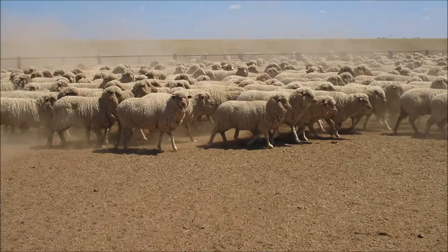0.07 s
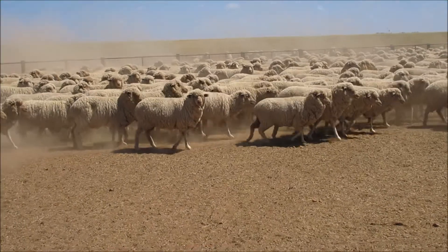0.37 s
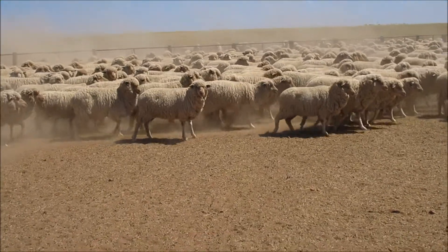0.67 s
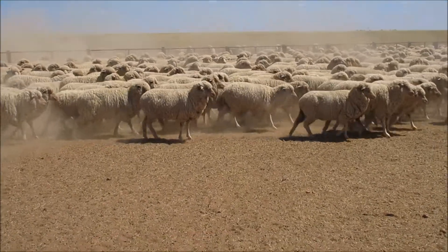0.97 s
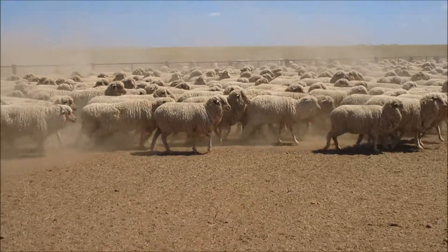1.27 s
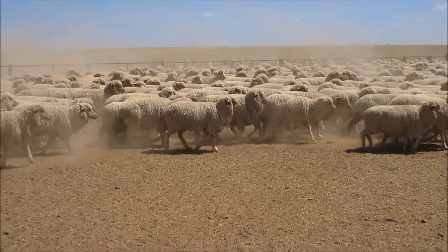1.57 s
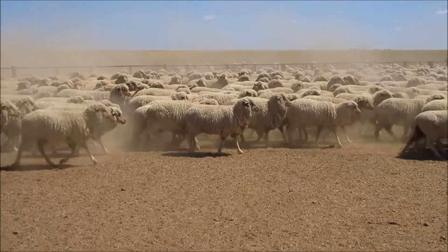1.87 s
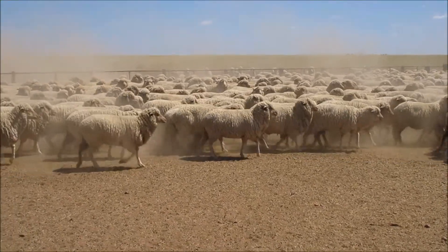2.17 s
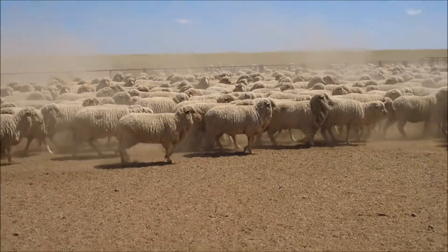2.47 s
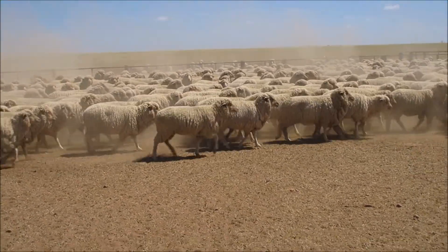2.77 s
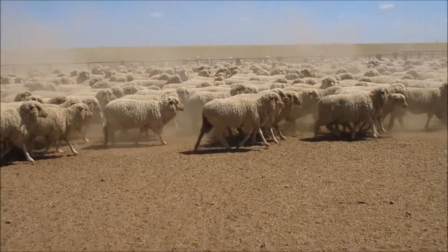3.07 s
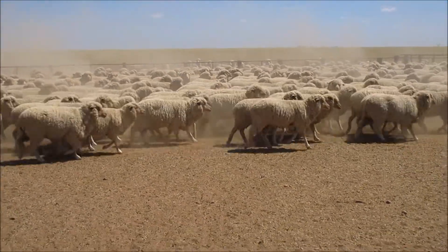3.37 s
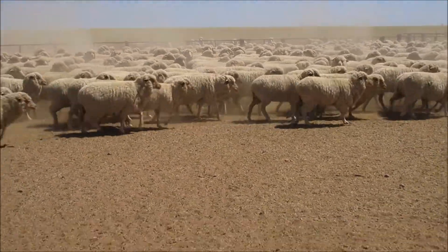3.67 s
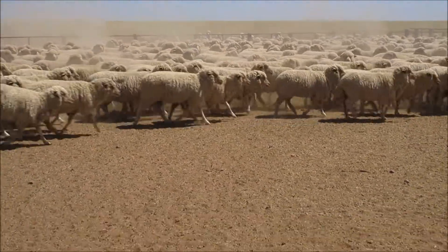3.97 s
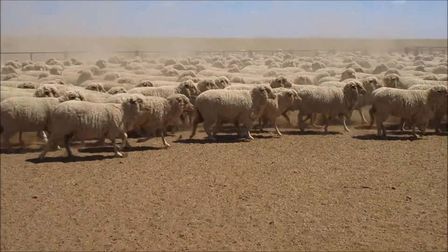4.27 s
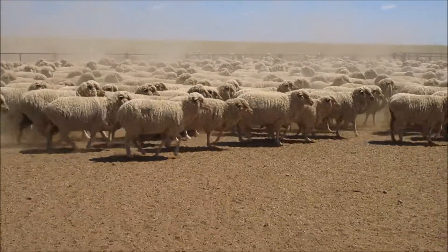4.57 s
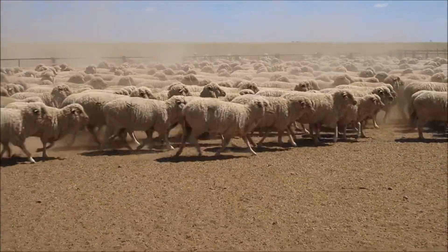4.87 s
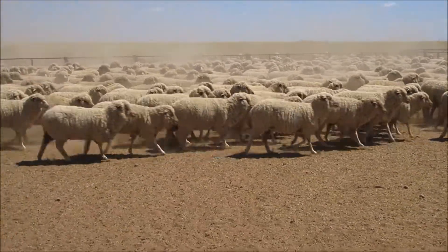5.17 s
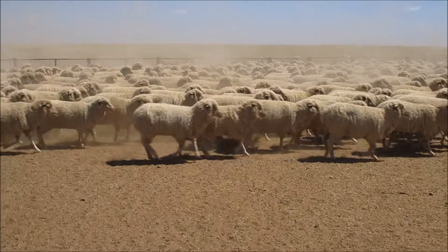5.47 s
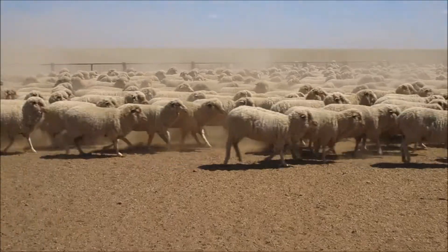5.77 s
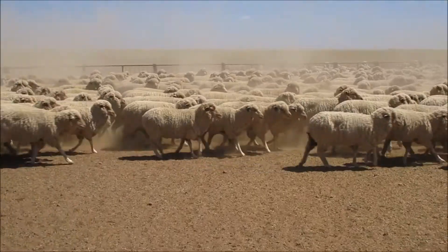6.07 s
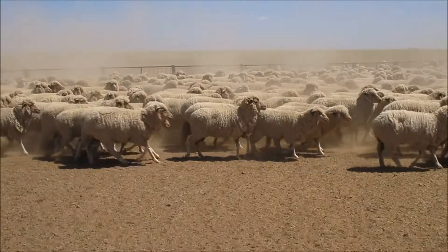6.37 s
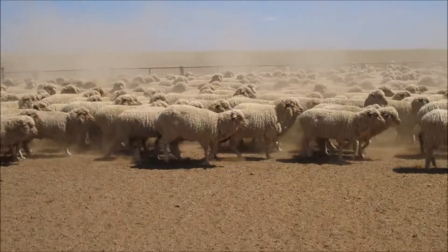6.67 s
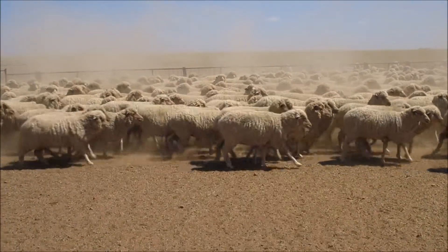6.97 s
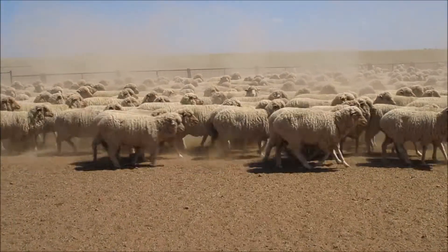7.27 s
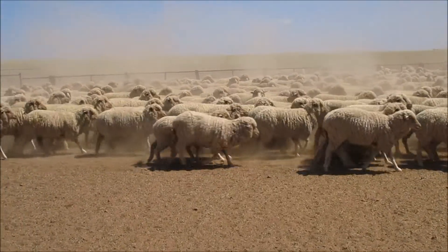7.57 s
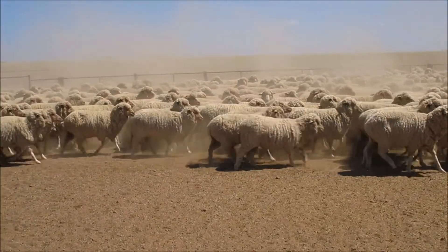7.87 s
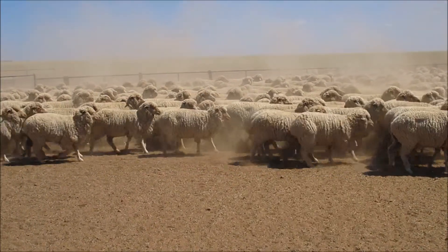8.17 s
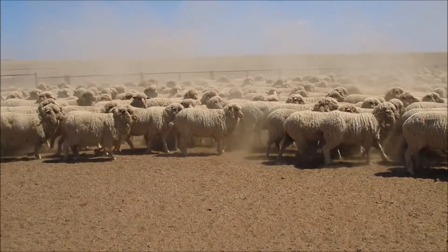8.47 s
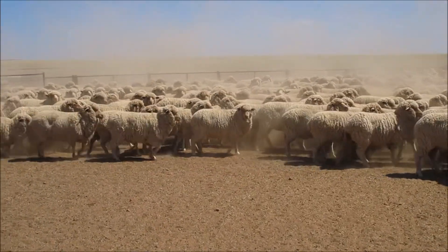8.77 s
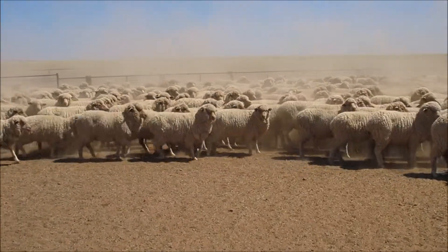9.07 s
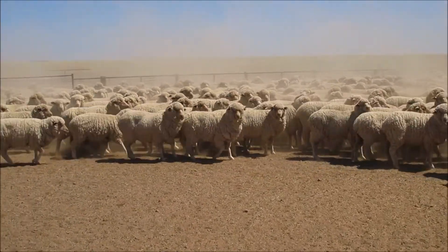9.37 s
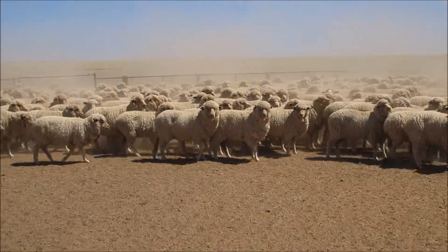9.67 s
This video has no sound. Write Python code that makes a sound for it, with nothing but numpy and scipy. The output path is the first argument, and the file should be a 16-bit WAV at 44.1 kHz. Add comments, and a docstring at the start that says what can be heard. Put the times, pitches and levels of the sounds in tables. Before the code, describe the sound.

Out in the open, many sheep hooves make a quiet, continuous patter on dry, gritty earth, dotted with small stone clicks and brief scrapes. Wind hits the microphone in low, fluttering gusts, faint to begin with, then stronger. In the later seconds hard thumps dominate, briefly pushing down all other sound, and one cracks sharply. The shuffling dies away under the continuing wind.

```python
"""A large flock of sheep shuffles past outdoors, over dry, gritty ground, in a light wind.
Countless hooves thud, scuff the dust and crunch grit; now and then one clicks on a pebble or drags.
From 3 s stronger gusts roll eddies over the microphone, rumbling, sputtering and thumping.
From 6.5 s the hardest thumps make the gain control duck everything; one cracks near 7.9 s.
The flock fades toward the end while the wind blows on."""
import sys
import numpy as np
from scipy import signal
from scipy.fft import rfft, irfft
from scipy.io import wavfile
from scipy.ndimage import uniform_filter1d, minimum_filter1d, map_coordinates

SR = 44100
rng = np.random.default_rng(int(sys.argv[2]) if len(sys.argv) > 2 else 0)


def persist_wave(psi):
    """Save psi, clipped to +-1, as 16-bit WAV."""
    counts = np.round(np.clip(psi, -1, 1) * 32767).astype(np.int16)
    wavfile.write(sys.argv[1], SR, np.atleast_2d(counts).T)


N = 428211
T = np.arange(N) / SR


def gain_of(db):
    """Decibels to amplitude."""
    return 10 ** (np.asarray(db) / 20)


def unit_rms(x):
    """Scales to rms 1."""
    return x / np.sqrt(np.mean(x ** 2) + 1e-20)


def curve(rows):
    """Interpolates (time_s, value) rows at every sample."""
    return np.interp(T, *np.transpose(rows))


def add(mix, start_s, sound):
    """Mixes a sound in at start_s."""
    part = mix[max(round(start_s * SR), 0):][:len(sound)]
    part += sound[:len(part)]


def coloured(x, spectrum):
    """Minimum-phase filter from (freq_hz, level_db) rows; clicks keep their sharp front."""
    hz, db = np.transpose(spectrum)
    bins_hz = abs(np.fft.fftfreq(2048, 1 / SR))
    log_gain = np.log(gain_of(np.interp(np.log(bins_hz + 1), np.log(hz), db)))
    taps = np.fft.ifft(np.exp(np.conj(signal.hilbert(log_gain)))).real
    return signal.oaconvolve(x, taps)[:N]


def flutter(rate_hz):
    """Smooth random curve, rms 1, rolling off at rate_hz."""
    hz = np.fft.rfftfreq(N, 1 / SR)
    return unit_rms(irfft(rfft(rng.standard_normal(N)) * np.exp(-(hz / rate_hz) ** 2), N))


def ring(x, hz, q):
    """One broad resonance."""
    return signal.lfilter(*signal.iirpeak(min(hz, SR / 4), max(q, .6), SR), x)


def stroke(length_s):
    """Hoof pressure envelope: quick rise, slower fade, peak 1."""
    u = 4 * np.arange(int(2 * length_s * SR) + 2) / (length_s * SR)
    return u * np.exp(1 - u)


# Spectrum of the merged far hooves: freq_hz, level_db
WASH_SPECTRUM = [(40, -20), (120, -1), (250, 1), (450, 0.5), (750, 1.5), (1020, -1), (1700, -5),
                 (3000, -5.5), (4700, -7), (6500, -11.5), (9000, -14), (12000, -21), (15000, -30)]


def far_hooves(level_db=1.0, patchy_db=1.65, flutter_db=0.62, flutter_hz=22):
    """The bulk of the flock: a wash whose bands swell and fade as steps overlap."""
    bands = signal.stft(rng.standard_normal(N), SR, nperseg=512)[2]
    patches = uniform_filter1d(rng.standard_normal(bands.shape), size=14, axis=0)
    patches = unit_rms(uniform_filter1d(patches, size=5, axis=1))
    noise = signal.istft(bands * gain_of(patchy_db * patches), SR)[1][:N]
    wash = unit_rms(coloured(noise, WASH_SPECTRUM))
    return wash * gain_of(level_db + flutter_db * flutter(flutter_hz))


# Spectrum of crushed grit: freq_hz, level_db
GRIT_SPECTRUM = [(200, -10), (900, 6), (2000, 1), (4500, 0), (7000, -1.5), (10000, -5.5), (15000, -11)]


def grit(load, grains_per_s=1700, spread_db=5.5, centre_hz=3500, sizes=15):
    """Grains crack under the load of the hooves; each grain size snaps in its own band."""
    cracks = (rng.random(N) < grains_per_s * (load + .3) / SR) * rng.choice([-1, 1], N)
    grains = cracks * gain_of(spread_db * np.minimum(rng.exponential(1, N), 4.5))
    size = rng.integers(0, sizes, N)
    bands_hz = centre_hz * np.geomspace(1 / 3, 3, sizes)
    snaps = sum(ring(grains * (size == k), hz, q=2.0) for k, hz in enumerate(bands_hz))
    return unit_rms(coloured(snaps, GRIT_SPECTRUM))


def near_hooves(steps_per_s=70, spread_db=3.0, thud_db=-8, scuff_db=-9, grit_db=-4.5,
                thud_hz=330, scuff_hz=1700, slide_s=.012):
    """Each step thuds on packed earth, scuffs the dust and crushes a cluster of grit."""
    thuds, scuffs, load = np.zeros((3, N))
    for when, softness, scuff_tone, thud_tone, length in rng.random((int(steps_per_s * N / SR), 5)):
        start_s = when * N / SR
        force = gain_of(-spread_db * np.log(softness + 0.073))
        press = force * stroke(slide_s * 2 ** (2 * length - 1))
        add(load, start_s, press)
        dust = ring(rng.standard_normal(len(press)), scuff_hz * 3 ** (2 * scuff_tone - 1), q=2.5)
        add(scuffs, start_s, press * dust)
        hz = thud_hz * 2 ** (2 * thud_tone - 1)
        blow = force * stroke(2.5 / hz)
        add(thuds, start_s, blow * np.sin(2 * np.pi * hz * T[:len(blow)]))
    return (gain_of(thud_db) * unit_rms(thuds)
            + gain_of(scuff_db) * unit_rms(coloured(scuffs, GRIT_SPECTRUM))
            + gain_of(grit_db) * grit(load / load.mean()))


# Whole shuffle: time_s, gain_db
FLOCK_GAIN = [(0, -46.5), (1.5, -47.5), (3.3, -46), (4.1, -46.3), (5, -45.5), (6.4, -46), (7.2, -45.3),
              (7.7, -47.5), (8.85, -48), (9.7, -53)]
# Nearness of the front row: time_s, gain_db
FRONT_ROW_GAIN = [(0, -1.9), (2.7, 0.6), (3.4, 1.5), (6.4, 1.4), (9.7, -3.5)]


def flock():
    """The sheep file past, the front row's steps over the far wash."""
    return gain_of(curve(FLOCK_GAIN)) * (far_hooves() + gain_of(curve(FRONT_ROW_GAIN)) * near_hooves())


def swell(start_s, hold_s, rise_s, fall_s):
    """Sample span and envelope of a rush of air, at full strength from start_s for hold_s."""
    span = slice(*np.searchsorted(T, [start_s - 10 * rise_s, start_s + hold_s + 10 * fall_s]))
    t = T[span] - start_s
    return span, np.exp(-np.maximum(-t, 0) / rise_s - np.maximum(t - hold_s, 0) / fall_s)


# Air between gusts: time_s, pressure_db
BREEZE = [(0, -41.5), (0.55, -48), (1.8, -46.5), (2.3, -41.5), (2.85, -45.5), (3.2, -44), (4.0, -41),
          (4.5, -35), (5.6, -40), (6.0, -33), (6.8, -26), (7.8, -26), (8.05, -28), (8.5, -25), (9.7, -24)]
# Gusts: start_s, hold_s, pressure_db, eddy_rate_hz
GUSTS = [(0.024, 0.1, -32, 85.4), (0.194, 0.016, -32.5, 95.4), (0.707, .08, -35, 89.9),
         (1.102, 0.026, -36, 84.6), (2.057, 0.058, -41.5, 95.5), (3.31, .075, -23, 190.1),
         (3.465, .15, -22.5, 150), (3.709, 0.073, -27, 130), (4.189, 0.12, -27, 130),
         (4.418, 0.023, -26, 114.8), (4.559, .03, -25.5, 100), (4.73, .11, -30, 135.1),
         (4.928, 0.032, -29, 94.96), (5.111, 0.083, -28, 105.1), (5.468, 0.029, -30, 70),
         (5.772, 0.066, -30, 78.9), (6.119, 0.051, -23, 115.8), (6.255, 0.095, -27, 104.8),
         (6.459, 0.062, -26, 134.9), (6.581, 0.082, -16, 210), (7.08, 0.062, -14.5, 107.8),
         (7.22, .18, -16.5, 205), (7.471, .15, -14, 250), (8.088, .04, -22.5, 170.1),
         (8.271, 0.061, -14, 265.5), (8.611, .15, -15.5, 174.8), (8.895, .06, -15.5, 274.7),
         (8.969, 0.0496, -8.5, 280.3), (9.059, 0.051, -12, 299.9), (9.16, .32, -19.5, 205),
         (9.59, .04, -14, 264.4), (9.68, .03, -17.5, 175)]


def airflow(breeze_hz=100, wake_cap_db=6.5):
    """Pressure (dB) and eddy rate (Hz) at the microphone, from breeze, gusts and the wakes of thumps."""
    power = gain_of(curve(BREEZE)) ** 2
    weighted_hz = power * breeze_hz
    for start_s, hold_s, db, hz in GUSTS:
        span, envelope = swell(start_s, hold_s, rise_s=.018, fall_s=.03)
        gust = (gain_of(db) * envelope) ** 2
        power[span] += gust
        weighted_hz[span] += gust * hz
    wake_power = np.minimum(wakes(), power * gain_of(wake_cap_db) ** 2)
    return 10 * np.log10(power + wake_power), weighted_hz / power


def wind_rumble(pressure_db, rate_hz, trim_db=0.53, gusty_db=2.5, lumpy_db=2.5, port_hz=38):
    """A frozen pattern of eddies is carried past the microphone: faster air is louder and higher."""
    gust = flutter(rate_hz=40)
    eddies_passed = np.cumsum(rate_hz * np.exp(.05 * gust)) / SR
    points, per_eddy = 2 ** 17, 64
    lumps = gain_of(lumpy_db * unit_rms(uniform_filter1d(rng.standard_normal(points), size=per_eddy)))
    fineness = np.fft.rfftfreq(points, 1 / per_eddy)
    spectrum = fineness ** 0.85 * np.exp(-(1.316 * fineness) ** 1.165)  # fine eddies die out
    pattern = unit_rms(irfft(rfft(lumps * rng.standard_normal(points)) * spectrum))
    passing = map_coordinates(pattern, [eddies_passed * per_eddy], mode="wrap")
    pressure = unit_rms(passing * gain_of(gusty_db * gust)) * gain_of(pressure_db + trim_db)
    return signal.lfilter(*signal.butter(2, port_hz, "high", fs=SR), pressure)


def add_eddy(mix, centre_s, level_db, hz, steepness, phase_rad=0.93):
    """Mixes in one eddy, a push and a suck back: shorter the faster it passes."""
    t = np.arange(-SR // 40, SR // 40) / SR
    width_s = (steepness - .5) / (2 * np.pi * hz)
    pulse = (np.exp(1j * phase_rad) / (1 - 1j * t / width_s) ** steepness).real
    add(mix, centre_s - 1 / 40, gain_of(level_db) * pulse * np.hanning(len(t)))


# Small-eddy speed-up as the wind veers squarely onto the port: time_s, speed_factor
VEER = [(3.5, 1.4), (6.6, 1.95), (7.5, 1.5), (8.9, 1.94), (9.7, 1.9)]


def wind_sputter(pressure_db, rate_hz, trim_db=2.0, spread_db=9, share=.42, tries=3000):
    """Small quick eddies break off the edge of the microphone port, more often and sharper in fast air."""
    small_hz = curve(VEER) * rate_hz * (rate_hz / 260) ** 0.18
    out = np.zeros(N)
    for when, chance, softness, speed, turn in rng.random((tries, 5)):
        i = int(when * N)
        if chance < share * rate_hz[i] * (N / SR) / tries:
            hz = small_hz[i] * np.exp(.28 * (2 * speed - 1))
            db = pressure_db[i] + trim_db - spread_db * softness
            add_eddy(out, i / SR, db, hz, steepness=3.13, phase_rad=2 * np.pi * turn)
    return out


# Clearest hoof strikes on pebbles: start_s, level_db, pitch_hz
PEBBLE_CLICKS = [(0.450, -22.5, 2900), (1.0515, -25.5, 3510), (1.5177, -25.5, 4000), (1.541, -29, 4300),
                 (1.6956, -29, 5800), (2.1116, -28, 6040), (2.1445, -24.5, 2455), (2.6776, -22, 598),
                 (2.9985, -25.5, 2300), (3.5155, -22.5, 4400), (3.6106, -25.5, 5900), (4.3165, -25, 3050),
                 (4.8585, -25.5, 3650), (5.3187, -18.5, 2000), (5.9314, -25.5, 3795), (6.0435, -25.5, 5360),
                 (6.5436, -28, 5367), (7.2375, -23, 3470), (8.1486, -25.5, 2486), (8.4045, -27.5, 4100),
                 (9.506, -31, 3128)]


def pebbles(trim_db=1, snap_s=0.00015, rebound_s=0.001067, rebound_db=-11, detune=1.02,
            crumble_s=0.0026, crumble_db=-17, strays_per_s=2, stray_db=-32, stray_hz=(2400, 5500)):
    """Horn on stone: a dry snap, a brighter rebound, a little crumbling. Faint strays fall at random."""
    out, t = np.zeros(N), T[:SR // 20]
    envelope = t / snap_s * np.exp(1 - t / snap_s)
    low, high = (0, stray_db, stray_hz[0]), (N / SR, stray_db, stray_hz[1])
    strays = rng.uniform(low, high, (int(strays_per_s * N / SR), 3))
    for start_s, db, hz in [*PEBBLE_CLICKS, *strays]:
        snap = envelope * np.sin(2 * np.pi * hz / detune * t)
        rebound = gain_of(rebound_db) * envelope ** 2 * np.sin(2 * np.pi * hz * detune * t)
        noise = unit_rms(ring(ring(rng.standard_normal(len(t)), hz, q=1.4), hz, q=1.18))
        crumbs = gain_of(crumble_db) * noise * np.exp(-t / crumble_s)
        force = gain_of(db + trim_db)
        add(out, start_s, force * (snap + crumbs))
        add(out, start_s + rebound_s, force * rebound)
    return out


# Hooves dragged through dirt: start_s, level_db, centre_hz, length_s
HOOF_DRAGS = [(0.671, -42, 820, 0.058), (0.97, -42.5, 747, 0.026), (2.037, -40.5, 1248, 0.029),
              (2.763, -41.5, 1200, 0.043), (3.23, -44.5, 3600, 0.076), (3.816, -40.5, 835, 0.094),
              (5.602, -41.5, 904, 0.073), (7.234, -38.5, 1429, 0.018)]


def hoof_drags(q=1.14):
    """A dragged hoof rasps in one hollow band."""
    out = np.zeros(N)
    for start_s, db, hz, length_s in HOOF_DRAGS:
        press = stroke(length_s)
        rasp = ring(ring(rng.standard_normal(len(press)), hz, q), hz, q)
        add(out, start_s, gain_of(db) * press * unit_rms(rasp))
    return out


# Hardest eddies: centre_s, level_db, base_pitch_hz
THUMPS = [(3.276, -10.5, 128.7), (3.541, -5, 190), (3.609, 2, 137), (3.661, -6, 181), (3.687, -1.5, 300.3),
          (4.283, -11.5, 158), (4.733, -16, 285), (4.837, -8, 192.6), (5.128, -14, 131), (6.593, 6.5, 202),
          (6.641, -3, 239.7), (6.658, 9, 230), (7.205, 0.5, 242), (7.219, -1, 182.3), (7.272, -4, 260.4),
          (7.285, 2.5, 254), (7.348, -3, 273), (7.476, 6.5, 344.5), (7.492, 6.5, 380), (7.526, 7.5, 309.7),
          (7.584, 8, 295.2), (7.609, 2.5, 340), (7.652, 5, 225), (7.721, -9, 300), (7.894, 12, 362.6),
          (8.103, -8, 340.6), (8.302, 6, 300), (8.624, 1.5, 241.3), (8.915, 2, 240.4), (8.992, 7, 360),
          (9.014, 12.5, 199.8), (9.086, 7.5, 369), (9.267, -2, 271.8), (9.423, -5, 220.5), (9.458, -9, 260),
          (9.624, 1, 410.3), (9.677, -12, 290)]


def wind_thumps(trim_db=-1.0, pitch_ratio=1.037):
    """Hard eddies thump the microphone one by one."""
    out = np.zeros(N)
    for centre_s, db, hz in THUMPS:
        add_eddy(out, centre_s, db + trim_db, pitch_ratio * hz, steepness=2.85)
    return out


def wakes(under_db=14.5):
    """Power of the air that churns briefly around each thump."""
    power = np.zeros(N)
    for centre_s, db, _ in THUMPS:
        span, envelope = swell(centre_s, hold_s=0, rise_s=.009, fall_s=0.013)
        power[span] += (gain_of(db - under_db) * envelope) ** 2
    return power


def gain_control(x, threshold_db=-0.5, attack_s=0.0072, recovery_s=0.68):
    """A peak over the threshold quickly turns everything down; the gain creeps back."""
    over_db = np.maximum(20 * np.log10(abs(x) + 1e-9) - threshold_db, 0)
    recovery = np.exp(-T / recovery_s)
    held_db = np.maximum.accumulate(over_db / recovery, axis=-1) * recovery
    pole = np.exp(-1 / (attack_s * SR))
    return x / gain_of(signal.lfilter([1 - pole], [1, -pole], held_db))


# Microphone overload: centre_s, level_db, pitch_hz
OVERLOAD_CRACK = (7.894, 0, 920)


def overload_crack():
    """One sharp pulse: the crack of a strong eddy overloading the microphone."""
    out = np.zeros(N)
    add_eddy(out, *OVERLOAD_CRACK, steepness=1.035)
    return out


def scene():
    """The flock in the open, with wind on the microphone; mono."""
    hooves = flock() + pebbles() + hoof_drags()
    pressure_db, rate_hz = airflow()
    wind = wind_rumble(pressure_db, rate_hz) + wind_sputter(pressure_db, rate_hz)
    return (hooves + wind + wind_thumps() + overload_crack())[None]


def record(dry):
    """Gain control ducks after hard thumps, a quick limiter rounds off the rest, then a low-pass."""
    ducked = gain_control(dry)
    safe_gain = 1 / np.maximum(abs(ducked), 1)
    limited = ducked * uniform_filter1d(minimum_filter1d(safe_gain, size=301), size=301)
    fade_out = np.minimum((N - np.arange(N)) / 128, 1)
    low_pass = signal.firwin(511, cutoff=15250, window=("kaiser", 9), fs=SR)
    return signal.oaconvolve(limited * fade_out, low_pass[None], "same")


dry = scene()
out = record(dry)
persist_wave(out)
```